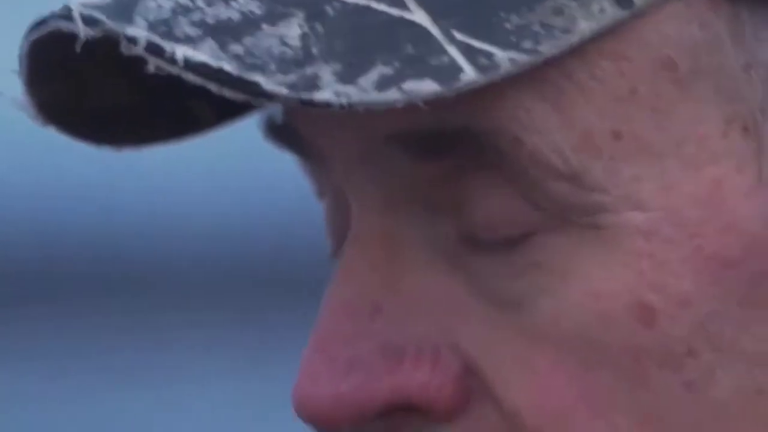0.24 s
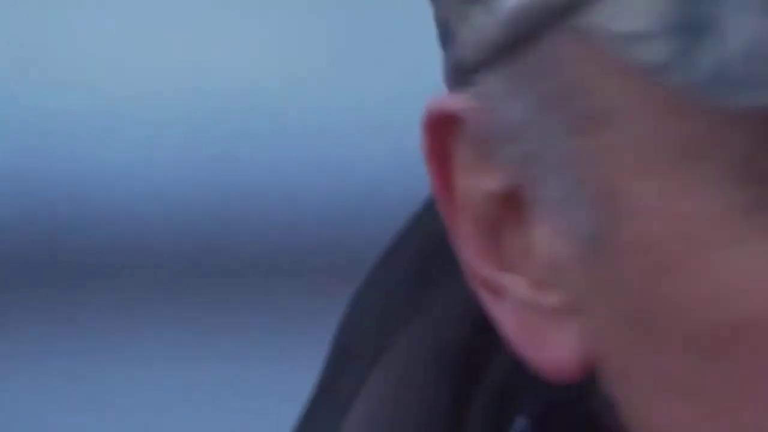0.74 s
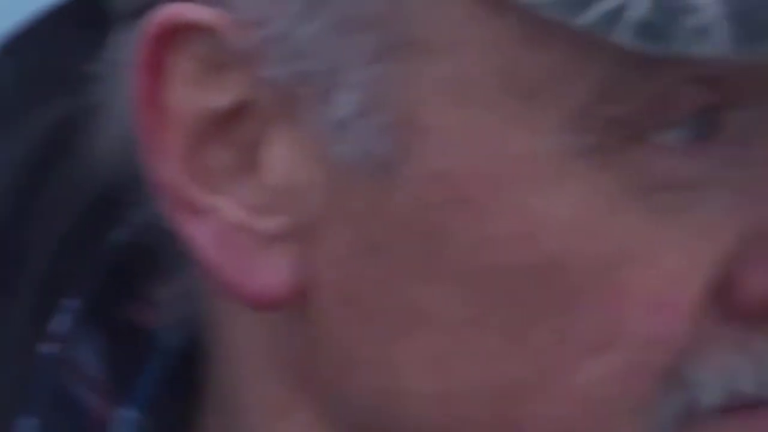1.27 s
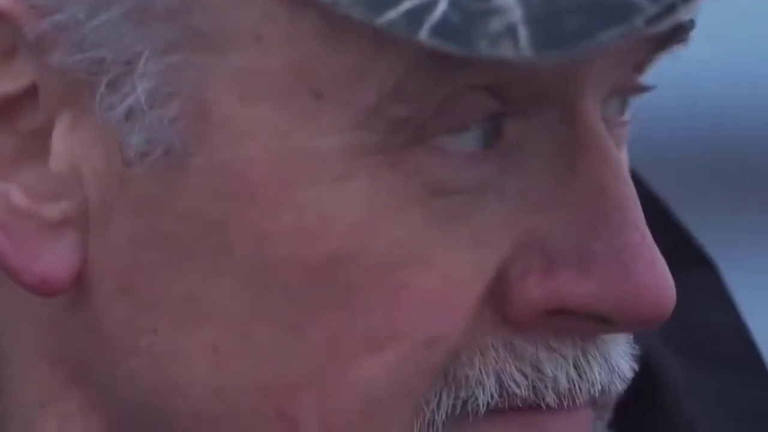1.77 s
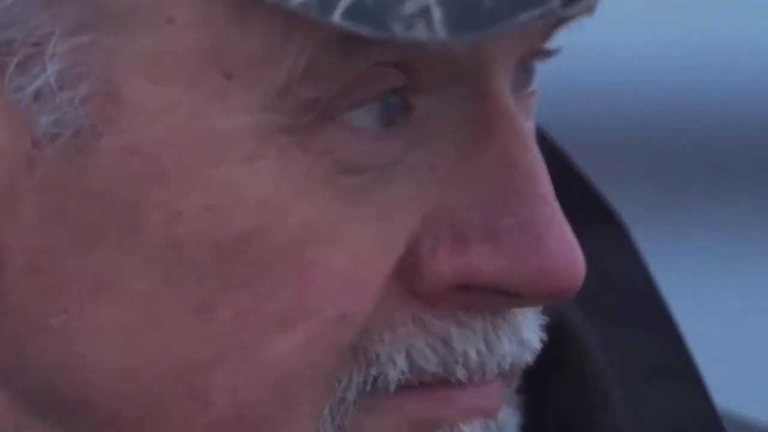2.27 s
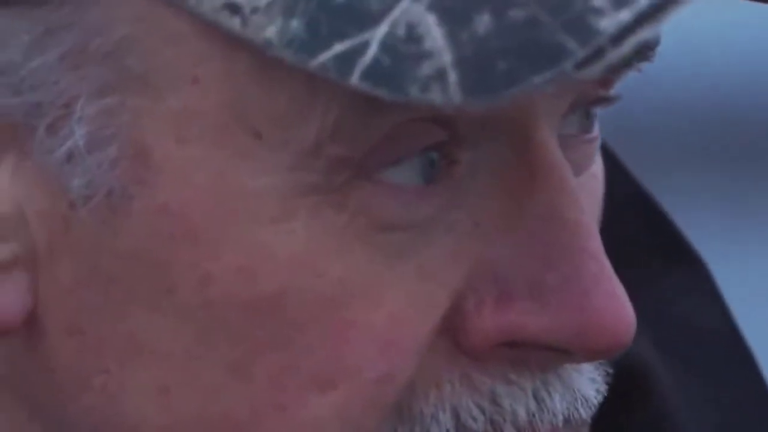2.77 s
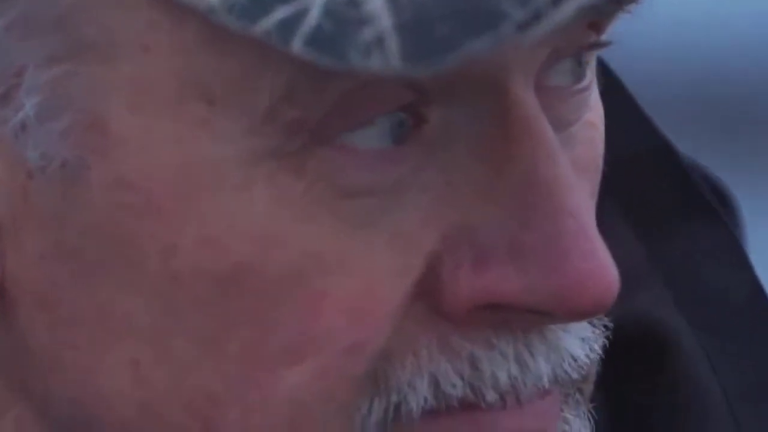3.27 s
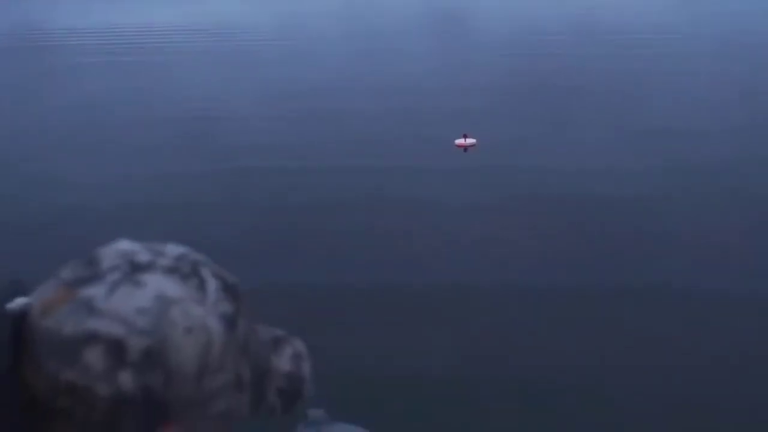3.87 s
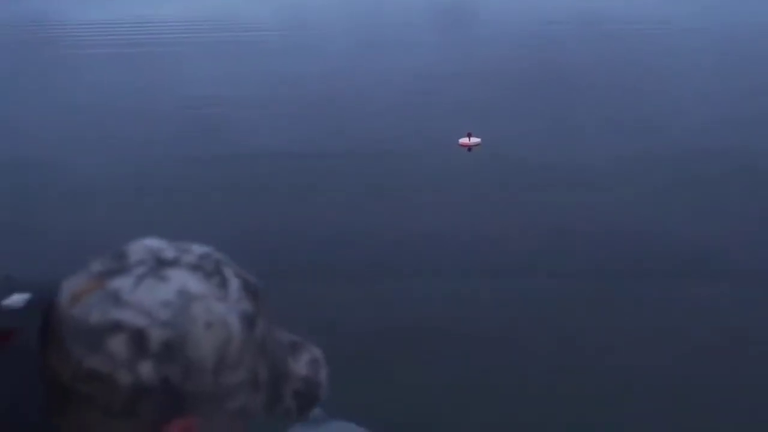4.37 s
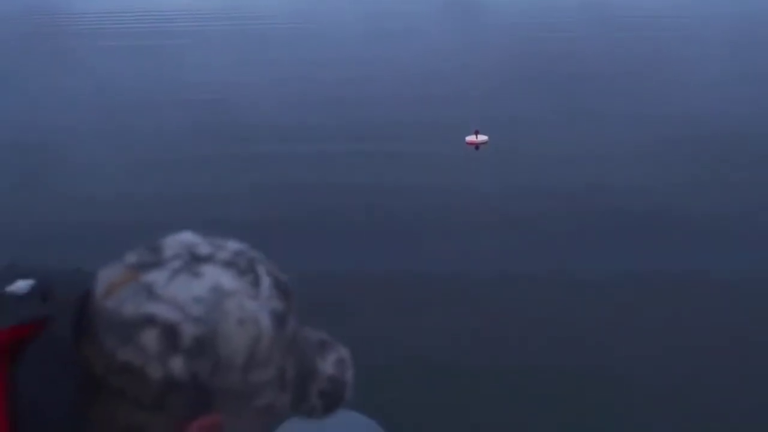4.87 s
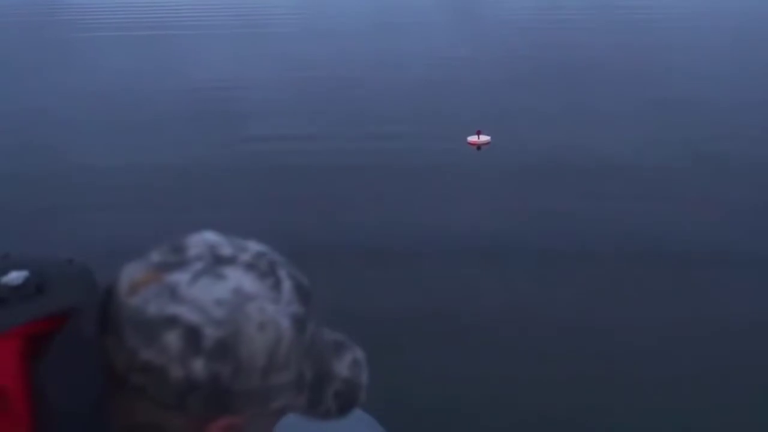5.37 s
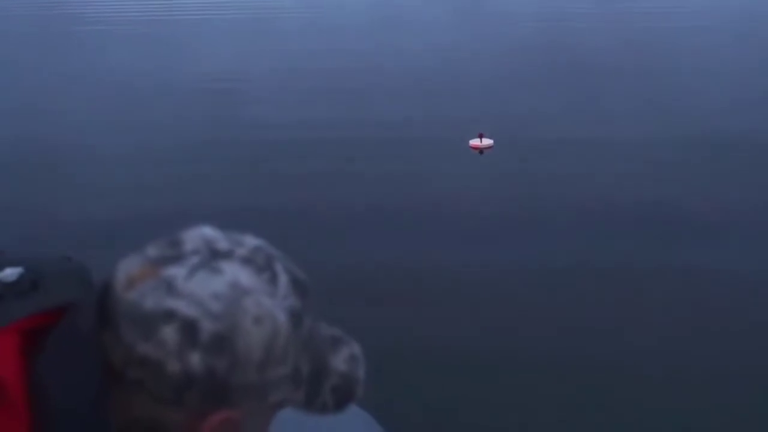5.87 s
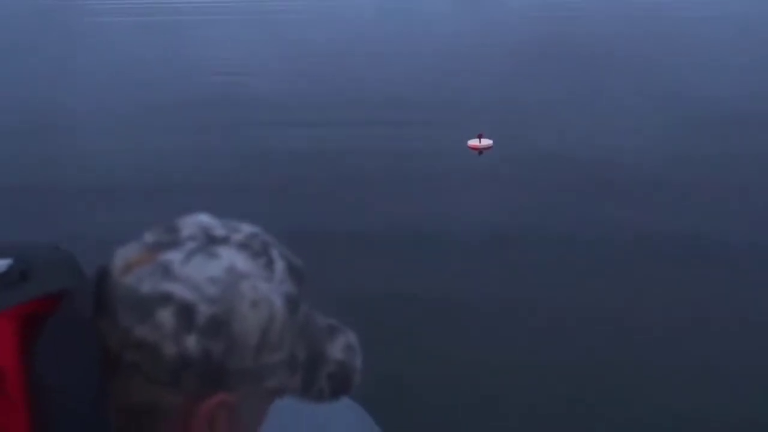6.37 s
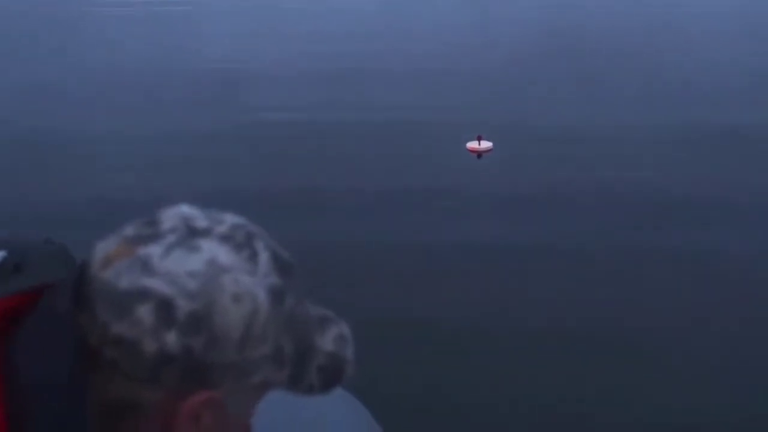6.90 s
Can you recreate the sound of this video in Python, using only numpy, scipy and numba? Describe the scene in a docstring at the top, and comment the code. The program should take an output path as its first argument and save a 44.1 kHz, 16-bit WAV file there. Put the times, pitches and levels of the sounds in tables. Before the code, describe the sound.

Gentle rowing on a calm lake: oar knocks, plops and drips over a low hull rumble, then fading to quiet.

```python
"""On a calm lake, aboard an inflatable boat: three strokes of the oars, then a glide to rest.
The air-filled hull rumbles at its low resonances; water thumps and gulps against it. Bubbles, each an
oscillating volume of air, gurgle, fizz and plop round the blades. Spray and a jacket crackle, oars knock,
and a rowlock hums under load. The recorder adds hiss, two faint tones and a steady offset."""
import sys
import numpy as np
from scipy import signal
from scipy.io import wavfile
from scipy.ndimage import uniform_filter1d
from numba import njit

SR = 44100
rng = np.random.default_rng(int(sys.argv[2]) if len(sys.argv) > 2 else 0)


def wav_record(signal):
    """Record a signal, one row per channel, as 16-bit PCM in the file named by sys.argv[1]."""
    frames = np.transpose(np.atleast_2d(signal))
    bounded = np.clip(frames, -1, 1)
    # unit amplitude maps onto the largest positive 16-bit level
    quanta = np.round(bounded * 32767).astype(np.int16)
    wavfile.write(sys.argv[1], SR, quanta)


N = 314874
TIME = np.arange(N) / SR


def undb(db):
    """Decibels to amplitude ratio."""
    return 10 ** (np.asarray(db) / 20)


@njit
def bandpass(x, hz, width):
    """Second-order resonator in state-variable form, with unit gain at its centre."""
    y, band, low = np.empty(len(x)), 0., 0.
    g, damping = np.tan(np.pi * hz / SR), width / hz
    for i in range(len(x)):
        v = (band + g * (x[i] - low)) / (1 + g * (g + damping))
        band, low, y[i] = 2 * v - band, low + 2 * g * v, damping * v
    return y


def wander(rate):
    """Smooth random modulation: rate new values a second, with a spread of about 0.55."""
    hold = int(SR / rate)
    steps = np.repeat(rng.standard_normal(N // hold + 1), hold)
    return 0.74 * uniform_filter1d(uniform_filter1d(steps, hold), hold)[:N]


def swell(start, length, attack_s, release_s):
    """Trapezoidal envelope: rise, hold and fall."""
    end = start + max(length, attack_s)
    return np.interp(TIME, [start, start + attack_s, end, end + release_s], [0, 1, 1, 0])


def add(out, start, sound):
    """Superpose a short sound at start seconds."""
    i = int(start * SR)
    out[i:i + len(sound)] += sound[:N - i]


@njit
def bubbles(onset, hz, cycles, size, glide):
    """Each bubble is a damped oscillator of rising pitch, followed for five time constants."""
    out = np.zeros(N)
    for k in range(len(onset)):
        phasor, step = size[k] + 0j, 2 * np.pi * hz[k] / SR
        fade = np.exp(-hz[k] / SR / cycles[k])
        span = min(int(5 * cycles[k] * SR / hz[k]), N - onset[k])
        for i in range(span):
            phasor *= fade * np.exp(1j * step * (1 + glide * i / span))
            out[onset[k] + i] += phasor.imag
    return out


def churn(modes, flicker_db, flicker_hz, pops_per_s, cycles, spread_db, pop_db, stir=1):
    """Random excitation: each resonance holds flickering noise and pops scaled by stir; unit rms."""
    out = 0
    for hz, width, db in modes:
        band = bandpass(rng.standard_normal(N), float(hz), 1.52 * width)
        band = bandpass(band, float(hz), 1.52 * width)
        when, pitch, life, size = rng.random((int(pops_per_s * N / SR), 4)).T
        size = undb(spread_db * np.minimum(-np.log(1 - size), 3.5))  # many small, few large
        onset = (when * N).astype(np.int64)
        pops = bubbles(onset, hz + width * (pitch - .5), cycles * (0.31 + life ** 2), size, glide=0.22)
        noise = undb(flicker_db * wander(flicker_hz)) * band / band.std()
        out = out + undb(db) * (noise + stir * undb(pop_db) * pops / pops.std())
    return out / out.std()


# Each row: time in seconds, rumble level in dB.
HEAVE = [(0.0, -35.5), (0.34, -42), (0.54, -33.5), (0.75, -36.5), (0.97, -37.5), (1.15, -31.5),
         (1.31, -33.5), (1.65, -34), (1.75, -37.5), (1.99, -36.5), (2.36, -33.5), (2.68, -37.5),
         (3.52, -32.5), (3.74, -37.5), (4.43, -38.5), (4.55, -40.5), (5.19, -42), (5.73, -52), (6.82, -50),
         (7.14, -49.5)]
# Each row: resonant frequency in Hz, bandwidth in Hz, relative gain in dB.
HULL_MODES = [(29.9, 34.8, -5.5), (46.5, 20, -2.5), (67.2, 25.5, -1.5), (90, 25.3, -4.5), (115.5, 33, -9)]


def hull_rumble():
    """Forced vibration: the modes of the air-filled hull respond as the boat heaves and slows."""
    heave = undb(np.interp(TIME, *np.transpose(HEAVE)))
    return heave * churn(HULL_MODES, flicker_db=0.69, flicker_hz=5.4, pops_per_s=6,
                         cycles=5.5, spread_db=2.4, pop_db=-8.5, stir=0.71)


# Each row: start in seconds, length in seconds, then gurgle, fizz and spray levels in dB.
SWISHES = [(0, 0.027, -44, -64, -68), (0.225, .28, -54, -61.5, -59.5), (0.562, 0.17, -65, -74, -64),
           (0.704, .15, -53.5, -59, -55.5), (0.86, 0.077, -54, -59, -54.5), (0.991, 0.046, -44, -60.5, -67),
           (1.075, 0.047, -43.5, -62.5, -71), (1.49, 0.079, -46.5, -70, -65),
           (1.927, 0.15, -44.5, -69, -70), (2.398, 0.15, -51.5, -73, -61.5),
           (2.519, 0.12, -50.5, -73, -57.5), (2.716, 0.096, -63, -69, -57), (2.816, 0.14, -46, -57.5, -51),
           (3.074, 0.13, -43.5, -59, -59), (3.325, 0.018, -54, -50, -64), (3.536, .11, -44.5, -62, -60.5),
           (3.684, 0.16, -46, -61, -62.5), (4.044, 0.17, -65, -72, -66), (4.191, .14, -52, -68, -73),
           (4.512, 0.12, -52.5, -65.5, -58.5), (4.647, 0.052, -55, -61.5, -62),
           (4.8, 0.15, -65, -67, -57.5), (4.949, 0.049, -71, -70, -61)]


def swish_envelopes():
    """Amplitude modulation: stirred water comes in uneven spurts of gurgle, fizz and spray."""
    swells = np.array([swell(start, length, attack_s=0.027, release_s=0.021)
                       for start, length, *_ in SWISHES])
    gains = undb(np.array(SWISHES)[:, 2:].T)
    return gains @ swells * undb(3.5 * wander(rate=60))


# The continuous bed of water sound. Each row: time in seconds, then gurgle, fizz and spray levels in dB.
WATER_BED = [(0, -45, -60.5, -62.5), (.2, -50, -65.5, -65), (.5, -46.5, -60, -61), (.95, -48, -63, -64),
             (1.3, -49.5, -65, -65), (1.7, -45.5, -63.5, -66.5), (2.03, -48, -60.5, -64.5),
             (2.4, -48.5, -62, -61), (2.7, -49.5, -59.5, -59.5), (3.05, -49.5, -62, -66.5),
             (3.45, -46, -62.5, -66.5), (3.9, -44.5, -60, -65), (4.43, -52.5, -63, -66),
             (4.77, -51, -62, -66), (5.3, -55, -67.5, -69), (5.75, -62.5, -77.5, -76), (6.0, -64, -73, -69),
             (7.1, -62.5, -74, -74)]
# Three sets of bands, low to high. Each row: centre in Hz, bandwidth in Hz, relative gain in dB.
GURGLE_BANDS = [(183, 48.4, 1.5), (271, 122, -4.5), (387.4, 186, -8), (593, 244, -10), (930, 386, -13.5),
                (1294, 600, -14)]
FIZZ_BANDS = [(2060, 1050, 2.5), (2990, 1070, 5.5), (3840, 2020, 5.5)]
SPRAY_BANDS = [(6040, 2800, 2), (8200, 2600, 0), (10200, 2300, 1.5), (11970, 640, -2)]


def water(bed_db, swishes):
    """Bubble resonance: large bubbles gurgle, small ones fizz. Bed and swishes add in power."""
    gurgle_db, fizz_db, spray_db = bed_db
    gurgle_swish, fizz_swish, spray_swish = swishes
    stir = np.clip((gurgle_db + 71.5) / 18, 0, 1)  # calm water holds few bubbles
    gurgle = churn(GURGLE_BANDS, flicker_db=4.1, flicker_hz=25, pops_per_s=30,
                   cycles=3.34, spread_db=4.2, pop_db=-2.5, stir=stir)
    fizz = churn(FIZZ_BANDS, flicker_db=4.1, flicker_hz=40, pops_per_s=70,
                 cycles=4, spread_db=3.5, pop_db=-4.5, stir=stir)
    spray = churn(SPRAY_BANDS, flicker_db=3.3, flicker_hz=40, pops_per_s=120,
                  cycles=3.3, spread_db=4.2, pop_db=-0.6, stir=stir)
    return (np.hypot(undb(gurgle_db), slosh_envelope() + gurgle_swish) * gurgle
            + np.hypot(undb(fizz_db), fizz_swish) * fizz
            + np.hypot(undb(spray_db), spray_swish) * spray)


# Each row: centre in Hz, bandwidth in Hz, relative gain in dB.
JACKET_BANDS = [(9250, 2100, -7), (11450, 1200, -6)]


def jacket(spray_db, spray_swish):
    """Brief random transients merge into a high crackle, whose level follows that of the spray."""
    bed = undb(-73 + 0.34 * (spray_db - spray_db.mean()))
    rustle = np.hypot(bed, undb(-29) * spray_swish)
    return rustle * churn(JACKET_BANDS, flicker_db=3.1, flicker_hz=27, pops_per_s=60,
                          cycles=3.5, spread_db=3, pop_db=-0.58)


# Each row: start in seconds, level in dB, first and final pitch in Hz, time to decay 60 dB in ms.
THUMPS = [(0.102, -29.5, 249, 265, 57), (0.271, -29.5, 229, 232, 17), (0.423, -8.5, 55.6, 60, 82),
          (.441, -32, 383, 393, 77), (.493, -21.5, 207, 235, 42), (1.218, -21.5, 105, 109, 60),
          (1.165, -25, 60, 60, 130), (1.225, -20.5, 75, 65, 210), (1.467, -16, 66.4, 66, 174),
          (1.493, -18, 192, 228, 28), (1.555, -29.5, 202, 241, 73), (1.576, -25, 170, 169, 62),
          (1.705, -21, 60, 60, 210), (1.779, -21, 65, 59, 160), (1.991, -19, 160, 184, 67),
          (2.068, -35, 168, 180, 73), (2.244, -35.5, 290, 300, 76), (2.293, -15.5, 180, 182.5, 118),
          (2.3, -39, 75, 70, 100), (2.609, -28.5, 170, 173, 72), (2.844, -20.5, 141, 138, 69),
          (3.065, -18, 90, 90.5, 70), (3.131, -21, 84, 84.5, 120), (3.199, -21, 85, 86, 150),
          (3.286, -18, 41.7, 41.4, 160), (3.34, -13.5, 81, 86, 68), (3.553, -10, 91, 112, 64),
          (3.556, -16.5, 254, 294, 60), (3.564, -12, 173, 219, 75), (3.66, -23.5, 165, 170, 51),
          (3.687, -22, 70, 75, 170), (4.206, -27, 183, 196, 62), (4.255, -23.5, 192, 233, 45),
          (5.105, -27, 42, 45, 100), (5.17, -37.5, 239, 240, 75), (5.224, -25.5, 128, 129, 43),
          (5.599, -32, 89, 88.5, 65), (5.6, -43, 229, 240, 53)]


def thumps_and_gulps():
    """Damped oscillation: low thumps and gulps of water against the hull, many rising in pitch."""
    out, t = np.zeros(N), np.arange(SR // 4) / SR
    for start, db, first_hz, final_hz, t60_ms in THUMPS:
        hz = final_hz + (first_hz - final_hz) * np.exp(-t / 0.016)
        attack = 1 - np.exp(-t * first_hz / 0.32)
        decay = 1000 ** (-1000 * t / t60_ms)
        add(out, start, undb(db) * attack * decay * np.sin(2 * np.pi * np.cumsum(hz) / SR))
    return out


# Each row: start in seconds, peak level in dB, centre in Hz, bandwidth in Hz.
DROPS = [(0.271, -47, 9990, 1250), (0.279, -38, 2550, 1600), (0.429, -44, 8730, 560),
         (0.464, -39, 6200, 910), (0.577, -45.5, 3380, 1020), (0.698, -46, 8610, 910),
         (0.715, -41.5, 9070, 910), (0.75, -39, 5870, 680), (0.758, -33.5, 4300, 1480),
         (0.784, -44, 8960, 910), (0.862, -34, 4200, 350), (0.934, -37, 9400, 4470),
         (0.945, -42, 6360, 1600), (1.015, -43, 3760, 300), (1.264, -45, 11000, 2520),
         (1.33, -46, 3750, 1250), (1.498, -28, 3070, 673), (1.517, -38, 2970, 330),
         (1.563, -44, 4360, 1020), (1.603, -45, 2360, 300), (1.977, -48, 4130, 560),
         (2.475, -44, 5300, 450), (2.536, -37, 6780, 1710), (2.546, -43, 12060, 790),
         (2.604, -37, 10400, 560), (2.606, -37.5, 5570, 330), (2.737, -44, 10200, 790),
         (2.775, -35.5, 10400, 1140), (2.782, -35.5, 4900, 1250), (2.812, -36, 10900, 1710),
         (2.862, -39.5, 2730, 300), (2.866, -45, 7240, 790), (2.867, -39, 10000, 790),
         (2.871, -38, 3330, 330), (2.88, -43, 2660, 300), (2.893, -36, 8150, 1710), (2.906, -39, 9150, 560),
         (2.921, -45, 5030, 450), (3.107, -47, 8040, 680), (3.12, -37, 3650, 450), (3.132, -47, 6100, 450),
         (3.163, -40.5, 2800, 910), (3.174, -44, 3740, 450), (3.335, -29.5, 3360, 1400),
         (3.358, -44, 4710, 300), (3.836, -42.5, 3450, 300), (3.906, -45, 4820, 298),
         (4.074, -44.5, 11300, 2980), (4.679, -49, 4500, 450), (4.815, -41, 3500, 910),
         (4.823, -45, 9440, 330), (4.878, -43, 7120, 3210), (4.882, -43.5, 2920, 330),
         (4.897, -39.5, 9200, 680), (4.928, -43, 3000, 300), (4.962, -46, 5500, 900),
         (4.972, -42, 2940, 1830), (4.985, -42.5, 3840, 910), (5.194, -54, 7810, 910),
         (5.854, -55, 2330, 300), (5.994, -54, 6890, 1480), (6.053, -56, 3680, 300)]


def spray_ticks():
    """Impact noise: each drop gives a millisecond or two of splatter, coloured by its size."""
    out, t = np.zeros(N), np.arange(SR // 40) / SR
    for start, db, hz, width in DROPS:
        burst = rng.standard_normal(len(t)) * np.exp(-t / 0.0016) * (1 - np.exp(-t / 0.00025))
        ring = bandpass(bandpass(burst, float(hz), 1.22 * width), float(hz), 2 * width)
        add(out, start, undb(db) * ring / np.abs(ring).max())
    return out


# Each row: start in seconds, peak level in dB, spectral tilt in dB per octave.
KNOCKS = [(0.279, -35, -10), (0.485, -39, -18), (.758, -40, -4), (0.813, -35, -12), (0.933, -42, 6.5),
          (1.012, -42, 7), (1.502, -29.5, 4.5), (1.514, -35, 5), (1.565, -29.5, 0.5), (1.719, -37, -10),
          (1.868, -33.5, -9), (2.289, -31, -20), (2.61, -26, -8), (2.736, -45, 10), (2.82, -33, 5),
          (3.356, -49, -7), (3.438, -30, 6), (3.549, -33, -17), (3.572, -35.5, 0), (3.62, -33, -4),
          (3.789, -34.5, -2), (4.205, -32.5, -1), (4.233, -42, 0.0), (4.256, -39, -6), (4.337, -37, 3.5),
          (4.879, -36, 6), (5.508, -48.5, 0.0), (5.857, -52, 7)]
# Each row: resonant frequency in Hz, bandwidth in Hz, relative gain in dB.
OAR_MODES = [(353, 31, 5.5), (614, 160, 12.5), (980, 150, 2), (1184, 44, 0), (1480, 64, -7),
             (2480, 200, -8), (3230, 330, -6)]


def oar_knocks():
    """Modal ringing: a brief rough contact excites the damped modes of shaft and rowlock."""
    out, t = np.zeros(N), np.arange(SR // 12) / SR
    for start, db, tilt in KNOCKS:
        scrape = rng.standard_normal(len(t)) * np.exp(-t / 0.0068)
        scrape[:8] += 1.5  # the first hard touch
        ring = 0
        for hz, width, mode_db in OAR_MODES:
            gain = undb(mode_db + tilt * np.log2(hz / 900)) * np.sqrt(300 / width)
            ring = ring + gain * bandpass(scrape, float(hz), float(width))
        add(out, start, undb(db) * ring / np.abs(ring).max())
    return out


def slosh_envelope(relative_db=-10, t60_s=0.092):
    """Exponential relaxation: each oar knock kicks up the gurgle, which then dies away."""
    kicks = np.zeros(N)
    for start, db, _ in KNOCKS:
        kicks[int(start * SR)] += undb(db + relative_db)
    decay = np.exp(-np.log(1000) / (t60_s * SR))
    return uniform_filter1d(signal.lfilter([1], [1, -decay], kicks), size=SR // 200)


# Each row: start in seconds, level in dB, nominal pitch in Hz, bandwidth in Hz.
PLOPS = [(0.28, -38, 390, 388), (0.444, -30.5, 433, 60.4), (0.484, -33, 1560, 370),
         (0.617, -42.5, 1380, 110), (0.635, -42, 784, 70), (1.199, -38.5, 1490, 240),
         (1.446, -32.5, 1530, 220), (1.487, -36, 1700, 300), (1.503, -43, 2090, 70), (1.519, -32, 645, 110),
         (1.522, -37, 1940, 410), (1.563, -30.5, 1314, 110), (1.72, -42, 710, 110), (1.864, -57, 850, 604),
         (1.944, -36, 1540, 150), (2.296, -39.5, 1310, 70), (2.609, -21, 570, 266), (2.817, -50, 1490, 242),
         (2.82, -34.5, 425, 71.5), (2.843, -45, 1760, 240), (2.971, -38.5, 1470, 250),
         (3.137, -32.5, 1550, 250), (3.244, -34.5, 1420, 300), (3.337, -34, 2080, 280),
         (3.355, -28, 516, 358), (3.436, -33.5, 2350, 151), (3.439, -21, 630, 55),
         (3.495, -36.5, 2110, 150), (3.55, -26.5, 1440, 200), (3.619, -30, 1450, 600),
         (3.789, -40, 600, 70.6), (4.039, -44, 1550, 150), (4.202, -43, 1390, 110), (4.235, -46, 1440, 70),
         (4.259, -46, 1420, 630), (4.34, -35, 1260, 200), (4.879, -49, 1260, 150), (5.008, -46, 520, 120),
         (5.161, -49.5, 920, 70), (5.212, -40, 375, 60), (5.328, -53.5, 890, 60), (5.422, -40, 1150, 109),
         (5.467, -48, 1030, 150), (5.511, -51, 1330, 240), (5.86, -56, 2110, 70), (5.953, -48, 2090, 200),
         (6.051, -51.5, 2040, 630)]


def plops():
    """Free oscillation: an air pocket rings, rising in pitch as it nears the surface, over a slap."""
    out, t = np.zeros(N), np.arange(SR // 10) / SR
    for start, db, hz, width in PLOPS:
        envelope = (1 - np.exp(-t / 0.001)) * np.exp(-np.pi * width * t)
        tone = np.sin(2 * np.pi * hz * (0.972 * t + 0.015 * width * t ** 2))
        slap = bandpass(rng.standard_normal(len(t)), float(hz), 0.5 * width)
        slap *= np.exp(-t / 0.0093) * (1 - np.exp(-t / 0.00095))
        rough = 1 + 2 * uniform_filter1d(rng.standard_normal(len(t)), size=90)
        add(out, start, undb(db) * (1.59 * envelope * tone * rough + 2.2 * slap))
    return out


# Each row: start in seconds, length in seconds, level in dB, first and final pitch in Hz.
GLUGS = [(.875, 0.013, -40, 394, 380), (0.925, 0.037, -37, 290, 310), (1.2, 0.049, -54, 1085, 1270),
         (1.448, 0.056, -49, 987, 954), (1.736, 0.064, -53.5, 990, 1286), (2.047, 0.036, -59, 1057, 1150),
         (2.158, .04, -56, 847, 880), (2.979, 0.042, -40, 370, 370), (3.777, 0.032, -42, 642, 566),
         (3.84, .02, -45, 600, 620), (3.94, 0.02, -50, 897, 900), (3.962, .03, -47, 607, 564),
         (5.129, 0.018, -58, 900, 1000), (5.235, 0.047, -61, 500, 1000), (5.946, 0.019, -62, 1857, 2190)]


def glugs():
    """Resonance of trapped air: larger pockets sing a short, slightly rough glide."""
    out = np.zeros(N)
    for start, length, db, first_hz, final_hz in GLUGS:
        count = int(length * SR)
        phase = 2 * np.pi * np.cumsum(np.linspace(first_hz, final_hz, count)) / SR
        rough = 1 + 5.6 * uniform_filter1d(rng.standard_normal(count), size=150)
        add(out, start, undb(db) * np.hanning(count) ** .5 * rough * np.sin(phase))
    return out


# Each row: start in seconds, length in seconds, hum level in dB.
ROWLOCK_LOADS = [(1.66, 0.51, -58.5), (4.48, 0.16, -62)]


def rowlock_hum(hz=599):
    """Friction-driven oscillation: the loaded pin chatters on one slightly unsteady note."""
    load = sum(undb(db) * swell(start, length, attack_s=0.11, release_s=.05)
               for start, length, db in ROWLOCK_LOADS)
    phase = 2 * np.pi * np.cumsum(hz * (1 + 0.0088 * wander(rate=20))) / SR
    return load * undb(wander(rate=22.18)) * np.sqrt(2) * np.sin(phase)


def scene():
    """Superposition: all sources sum at one microphone on board."""
    times, *levels = np.transpose(WATER_BED)
    bed_db = [np.interp(TIME, times, level) for level in levels]
    swishes = swish_envelopes()
    textures = hull_rumble() + water(bed_db, swishes) + jacket(bed_db[2], swishes[2])
    events = thumps_and_gulps() + oar_knocks() + plops() + glugs() + spray_ticks()
    return (textures + events + rowlock_hum())[None]


# The recorder's steady tones. Each row: frequency in Hz, rms level in dB.
WHINES = [(5950, -88.5), (12000, -88)]


def record(dry, cutoff_hz=12950, offset=-.0426):
    """Self-noise and band limiting: preamp hiss and faint whines, a steep low-pass, a constant offset."""
    hiss = undb(-77.5) * rng.standard_normal(N)
    hiss += undb(-99) * bandpass(rng.standard_normal(N), 11500., 3000.)
    whine = sum(undb(db) * np.sqrt(2) * np.sin(2 * np.pi * hz * TIME) for hz, db in WHINES)
    lowpass = signal.ellip(10, .2, 75, cutoff_hz, fs=SR, output="sos")
    return signal.sosfilt(lowpass, dry - dry.mean() + hiss + whine) + offset


dry = scene()
out = record(dry)
wav_record(out)
```